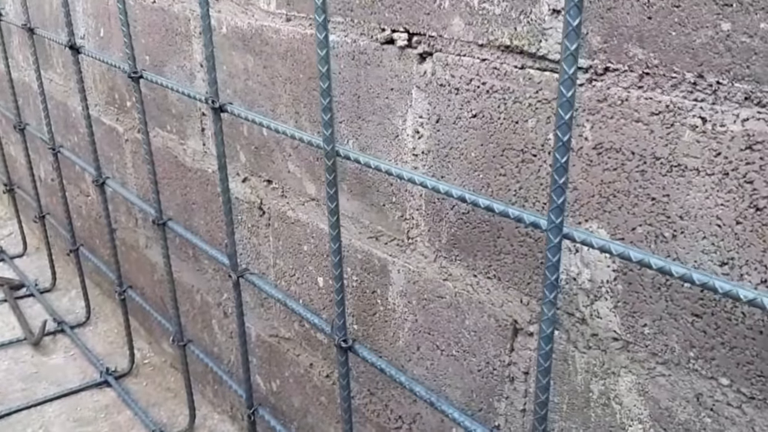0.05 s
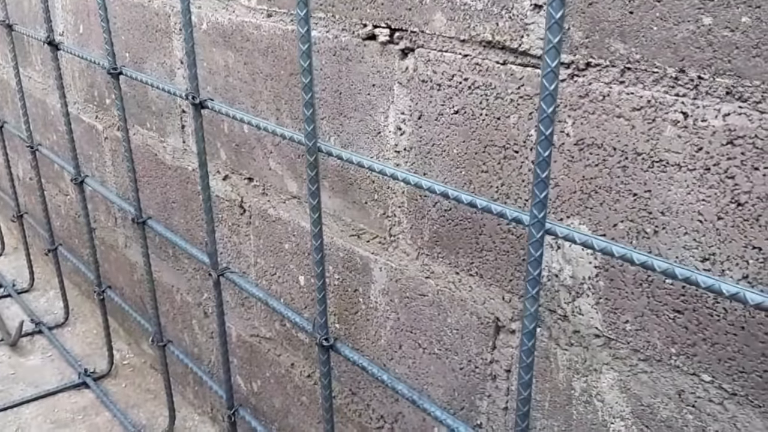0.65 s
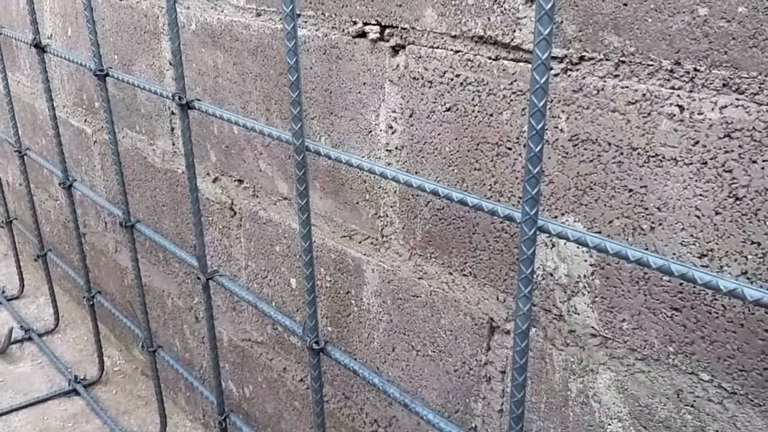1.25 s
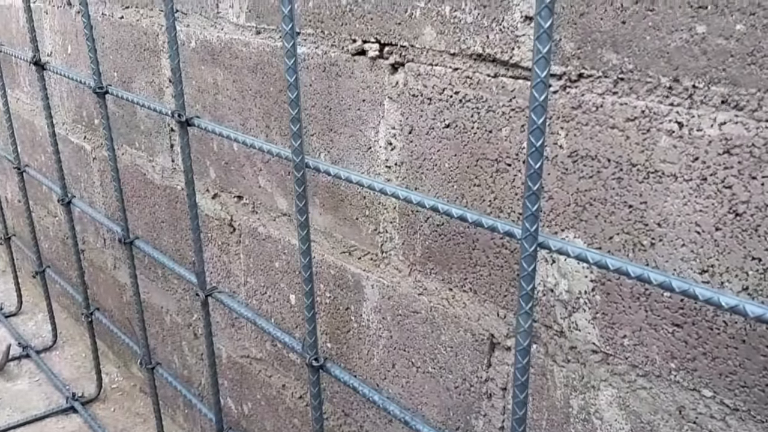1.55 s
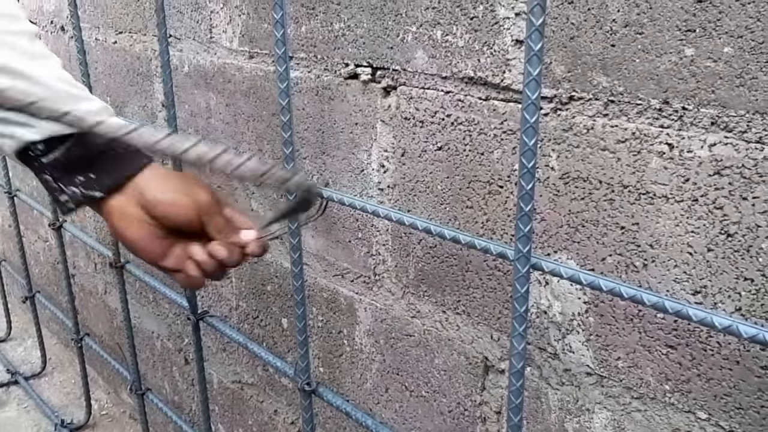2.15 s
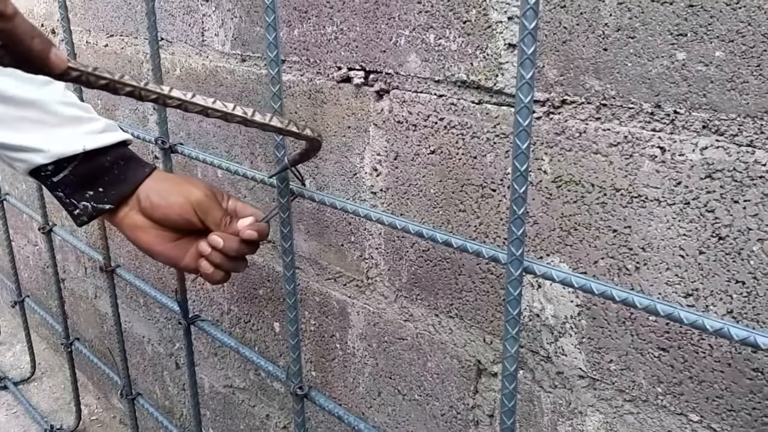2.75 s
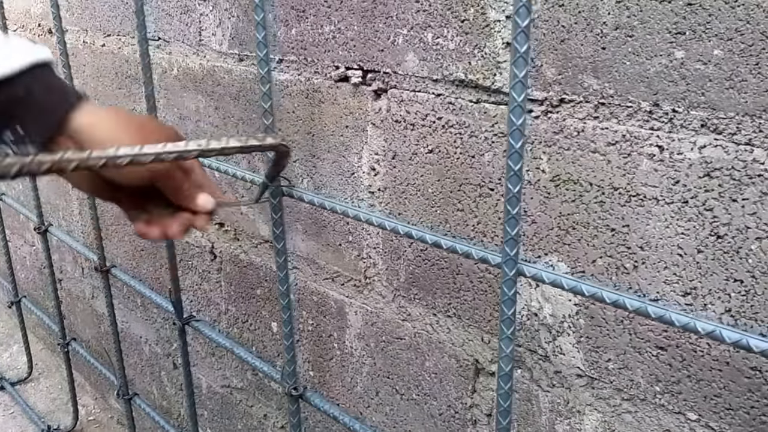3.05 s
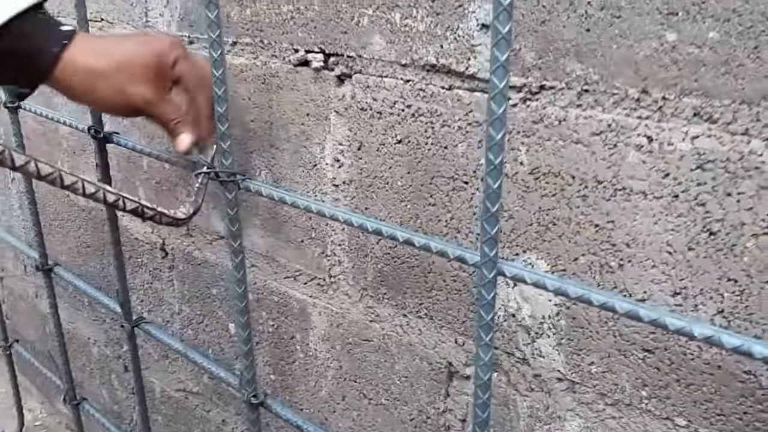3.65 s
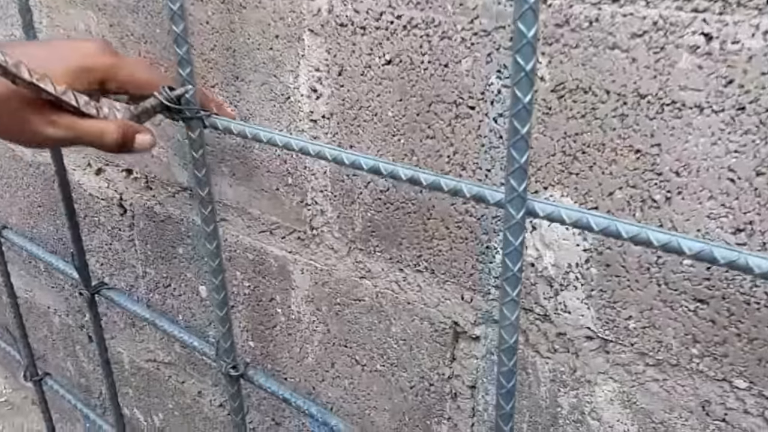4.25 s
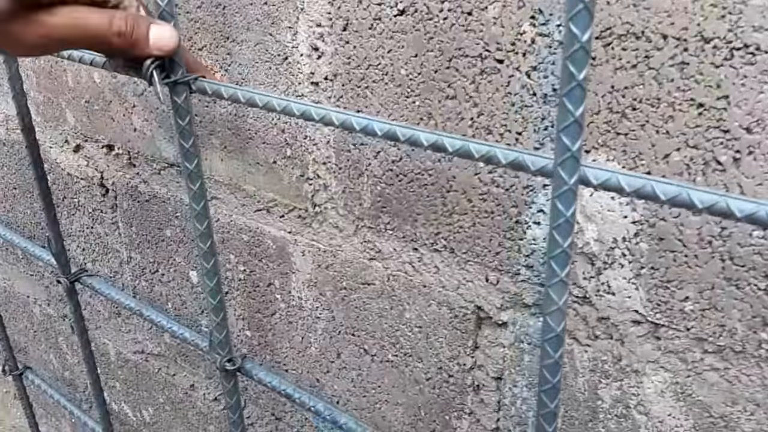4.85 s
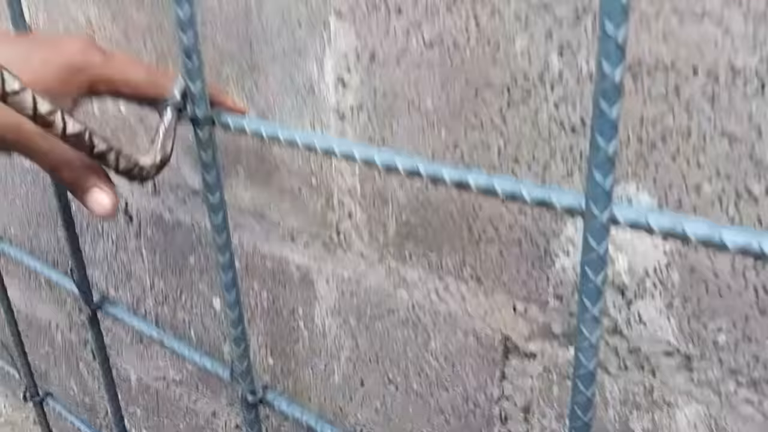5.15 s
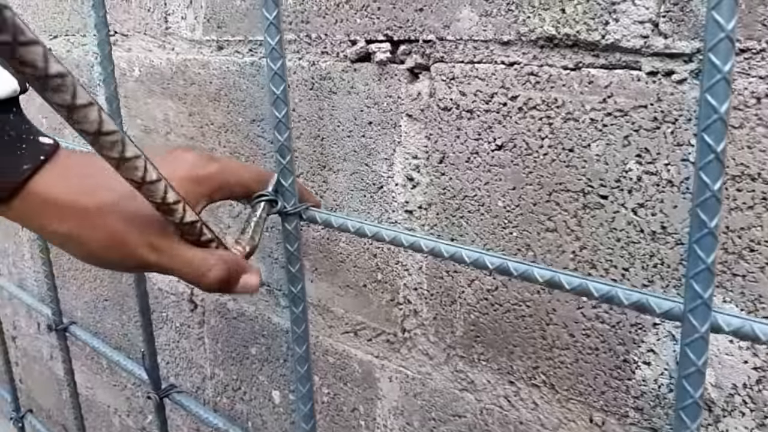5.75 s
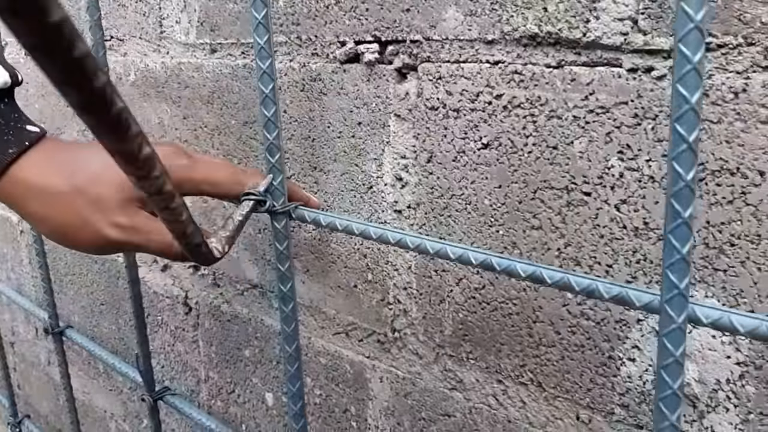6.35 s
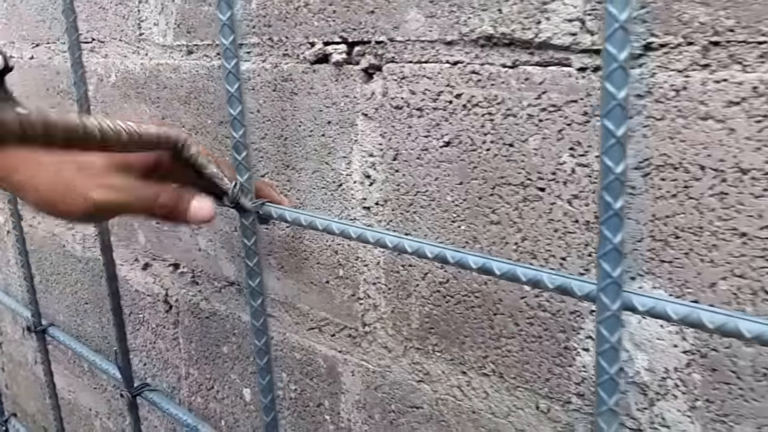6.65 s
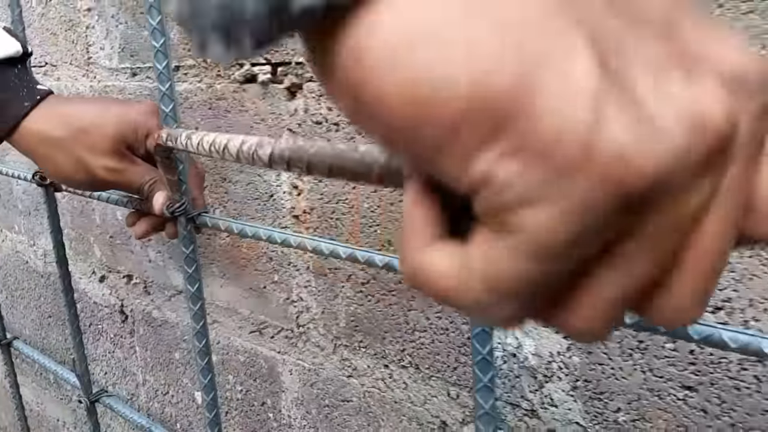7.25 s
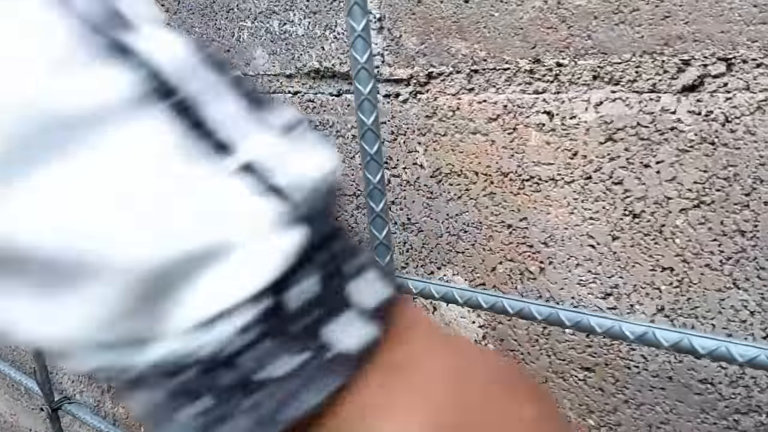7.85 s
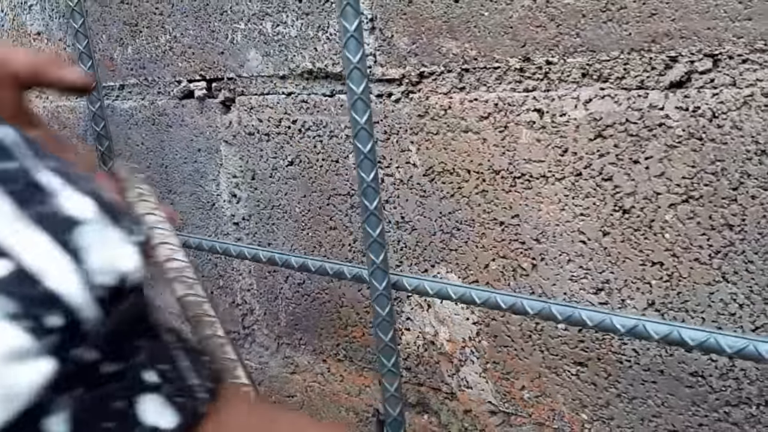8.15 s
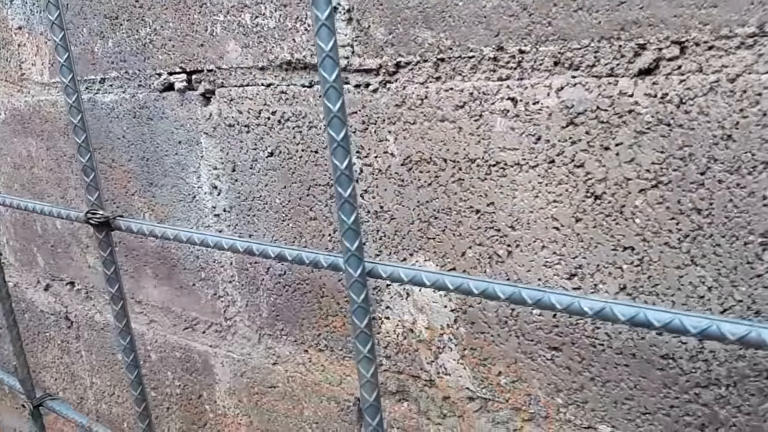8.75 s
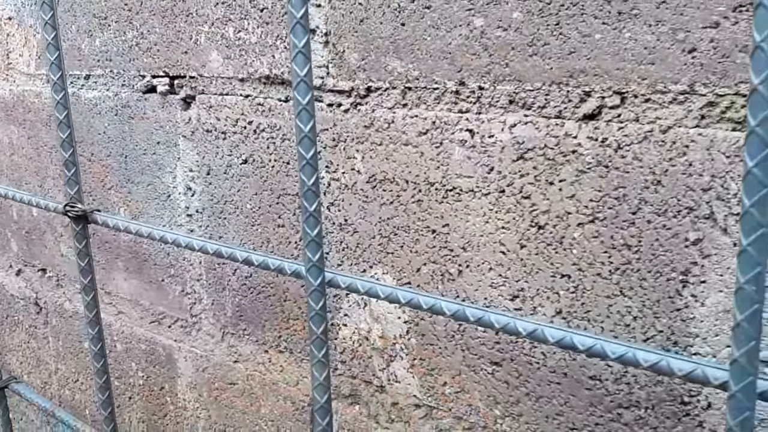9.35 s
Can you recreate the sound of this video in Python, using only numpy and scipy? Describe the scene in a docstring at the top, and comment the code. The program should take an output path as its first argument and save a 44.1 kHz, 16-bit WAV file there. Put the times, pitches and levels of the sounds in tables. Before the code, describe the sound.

Small wire clicks, gritty scrapes and light knocks surround a single loud clash of steel bars beside a block wall.

```python
"""Tying rebar in a bare room

Tie wire is twisted round a rebar mesh with a steel hook, close to a block wall in a ringing room.
The wire slips in small clicks, sleeve and grit scrape, masonry takes light knocks.
One loud blow sets the steel rattling and ducks the phone's gain. A low rumble hangs in the room."""
import sys
import numpy as np
from scipy import signal
from scipy.fft import rfft, irfft
from scipy.io import wavfile
from scipy.ndimage import uniform_filter1d, minimum_filter1d

SR = 44100
rng = np.random.default_rng(int(sys.argv[2]) if len(sys.argv) > 2 else 0)


def materialize(psi):
    """Save the field psi as 16-bit PCM at rate SR to the path in sys.argv[1].

    A 1-D psi becomes a single channel; in a 2-D psi each row is a channel.
    """
    bounded = np.clip(np.atleast_2d(psi).T, -1, 1)
    quanta = np.round(bounded * 32767).astype(np.int16)
    wavfile.write(sys.argv[1], SR, quanta)


N = 418068
T = np.arange(N) / SR

ROOM_DECAY = [(80, 1), (250, 0.71), (800, 0.44), (2000, 0.62), (5000, 0.48), (10000, 0.4), (16000, 0.23)]  # (frequency [Hz], t60 [s])
ROOM_MODES = [(91.1, 9.2, 5.5), (166.7, 3.9, -4), (181, 1.5, -22), (236.6, 15.7, -12)]  # (frequency [Hz], width [Hz], gain [dB])
BOOM_SWELLS = [(0.03, -45.5), (0.6, -50), (1.3, -66), (2.9, -57.5)]  # (time [s], level [dB])
WASH_SPECTRUM = [(20, -34), (45, -9.5), (70, -10), (110, -3), (135, -13.5), (165, -5), (240, -8.5),
                 (330, -15), (600, -19.5), (900, -20), (1400, -24), (2300, -20.5), (6000, -27.5),
                 (16000, -39)]  # (frequency [Hz], gain [dB])
ARM_MOVES = [(0, 0.033, -45), (.1, 0.576, -57.5), (1.015, 1.157, -52), (1.9, 2.2, -58.5),
             (2.692, 4.787, -57.5), (4.797, 6.616, -54), (6.62, 7.91, -58.5), (8.264, 8.607, -59),
             (8.878, 9.004, -48.5), (9.154, 9.48, -51.5)]  # (start [s], end [s], relative level [dB])
RUB_SPECTRUM = [(290, -31.5), (500, 0.5), (795, -6), (988, -10), (1060, -6), (1340, -27), (2160, 1.5),
                (2770, -5.5), (4940, 4), (8210, -3.5), (8960, -0.5), (16000, -10.5)]  # sleeve on wire: (frequency [Hz], gain [dB])
SQUEAK_MODES = [(1164, 270, 2), (2140, 540, 0.5), (4260, 780, -1)]  # (frequency [Hz], width [Hz], gain [dB])
GRIT_STROKES = [(0.122, -41.5, 0.04), (1.176, -39.5, 0.022), (1.361, -46, 0.04), (2.073, -40.5, 0.083),
                (2.192, -45, 0.031), (2.279, -45, 0.0095), (3.35, -23.5, 0.09), (3.455, -26, 0.019),
                (3.75, -39.5, .016), (3.892, -45, 0.026), (4.054, -48.5, 0.029), (5.86, -50.5, 0.028),
                (6.021, -46, 0.019), (7.15, -56.5, 0.076), (7.44, -48, 0.016), (8.762, -39.5, 0.04),
                (8.876, -32, 0.03), (8.969, -37, 0.05), (9.31, -39.5, 0.038), (9.443, -40, 0.042)]  # (peak time [s], relative level [dB], fall [s])
GRIT_SPECTRUM = [(300, -14.5), (480, -10), (900, -10.5), (1300, -16), (2150, -6), (3200, -9.5), (4400, 0.5),
                 (5300, -4.5), (6500, -6), (8500, -8), (12000, -10.5), (16000, -8.5)]  # (frequency [Hz], gain [dB])
MASONRY_KNOCKS = [(0.142, -38, 680, 0.01), (0.145, -45, 1820, 0.28), (1.022, -42, 260, 0.34),
                  (1.024, -43, 2590, 0.3), (1.349, -25.5, 558, 0.08), (5.56, -50.5, 165, 0.25),
                  (5.62, -49, 2860, 0.23), (6.471, -54.5, 307, 1), (7.128, -50, 860, 1),
                  (7.19, -53.5, 790, 0.9), (7.7189, -42.5, 2110, 0.08), (8.235, -51.5, 554, 0.36),
                  (8.519, -49.5, 2130, 0.23), (8.904, -41.5, 447, 0.46), (9.141, -47.5, 1520, 0.7),
                  (9.41, -45.5, 468, 0.9)]  # (time [s], level [dB], pitch [Hz], softness [0-1])
HOOK_MODES = [(862, 33, 14), (1800, 28, 12.5), (2380, 150, 12), (2900, 110, 14.5), (3500, 250, 5),
              (4140, 180, 12.5), (4570, 300, 9), (5200, 220, 10), (6340, 500, 6), (7800, 1200, 3),
              (13000, 3000, -17)]  # (frequency [Hz], width [Hz], gain [dB])
WIRE_SLIPS = [(0.584, -38.5), (0.889, -39), (1.084, -33), (1.110, -28), (1.142, -25.5), (1.172, -29),
              (2.412, -38.5), (2.449, -33.5), (2.632, -35.5), (4.320, -28.5), (4.406, -31.5), (4.427, -31),
              (4.912, -28.5), (4.969, -29), (5.118, -37), (5.249, -38.5), (5.496, -56), (5.940, -36),
              (6.118, -31), (6.172, -33), (6.375, -29), (6.401, -26), (7.432, -59), (8.098, -42),
              (8.734, -36), (8.860, -29.5), (9.247, -30), (9.272, -26.5)]  # (time [s], relative level [dB])
WIRE_SPECTRUM = [(240, -51.5), (400, -8), (1250, -11), (2220, -4), (3930, -2.5), (4380, 2.5), (6340, -4),
                 (10500, -4.5), (12300, -11.5), (14400, -4), (16000, -2.5)]  # (frequency [Hz], gain [dB])
TICK_SPECTRUM = [(1500, -13), (6000, -4), (14000, 0.5)]  # wire snap: (frequency [Hz], gain [dB])
STEEL_BLOWS = [(2.988, -5, -21), (2.994, 3.5, -6.5), (3.005, -12, 6), (3.023, -9.5, -19.5),
               (3.042, -7.5, -10.5), (3.065, -10.5, 0), (3.124, -8.5, -26)]  # clash and rebounds: (time [s], relative force [dB], relative thump [dB])
STEEL_MODES = [(163, -6, .8), (187, -6, .6), (215, -1, .6), (233, 2, .75), (257, -2, .6), (305, -2, .6),
               (336, -4, .6), (381, -3, .6), (405, -5, .6), (589, -3, .55), (813, -8, .7), (1066, -9, .4),
               (1346, -5, .45), (2272, -14, .5), (3242, -6, .8), (3914, -11, .35), (4290, -10, .4),
               (5602, -3, .45), (6002, -0.5, .68), (8113, -15, .4), (8608, -15, .5), (13780, -9, .52)]  # (frequency [Hz], relative level [dB], t60 [s])
CLASH_SPECTRUM = [(70, -34.5), (130, -21), (230, -17), (450, -13), (780, -14), (1050, -17), (1500, -25),
                  (2300, -16), (3100, -20.5), (4300, -14.5), (5900, -16.5), (8000, -22), (11800, -28),
                  (16000, -22.5)]  # (frequency [Hz], gain [dB])
PORT_CORRELATION = [(100, 0.98), (250, 0.78), (600, 0.69), (1200, 0), (16000, 0.04)]  # two microphone ports: (frequency [Hz], correlation [0-1])
PORT_BALANCE = [(100, -0.5), (300, -2.5), (700, -4), (1800, 0.5), (4500, 0.5), (6500, -5.5), (8500, -13),
                (11000, -5.5), (14000, -5)]  # (frequency [Hz], left minus right [dB])


def undb(db):
    """Decibels to gain."""
    return 10 ** (np.asarray(db) / 20)


def unit(x):
    """Scale to rms 1."""
    return x / np.sqrt(np.mean(x ** 2))


def peak(x, db, window=220):
    """Set the highest short-time rms of the mid signal."""
    return x * undb(db) / np.sqrt(uniform_filter1d(x.mean(0) ** 2, window).max())


def add(out, at_s, x):
    """Mix x in at a time."""
    i = max(int(at_s * SR), 0)
    out[:, i:i + x.shape[-1]] += x[:, :max(N - i, 0)]


def bell(at_s, half_s):
    """Gaussian swell of height 1."""
    return np.exp(-((T - at_s) / half_s) ** 2)


def walk(rate_hz):
    """Smooth random drift, rms 1."""
    step = int(SR / rate_hz)
    stairs = np.repeat(rng.standard_normal(N // step + 1), step)
    return unit(uniform_filter1d(stairs, step)[:N])


def along(table, hz):
    """Interpolate a table over log frequency."""
    f, value = np.transpose(table)
    return np.interp(np.log(hz + 1), np.log(f), value)


def shape(x, gain, size=16384):
    """Minimum-phase filter of magnitude gain(Hz)."""
    cepstrum = irfft(np.log(gain(np.arange(size // 2 + 1) * SR / size) + 1e-6))
    cepstrum[1:size // 2] *= 2
    cepstrum[size // 2 + 1:] = 0
    response = irfft(np.exp(rfft(cepstrum)))
    filtered = signal.fftconvolve(np.atleast_2d(x), response[None], axes=1)
    return filtered[:, :x.shape[-1]].reshape(x.shape)


def colour(x, spectrum):
    """Filter by (frequency [Hz], gain [dB]) points."""
    return shape(x, lambda f: undb(along(spectrum, f)))


def resonance(f, hz, width_hz):
    """Band-pass gain, 1 at the centre."""
    return f * width_hz / np.hypot(f * f - hz * hz, f * width_hz)


def grains(length, spread_db, grain_samples=24):
    """Dense micro-impacts of uneven size, two channels."""
    sizes = undb(spread_db * np.minimum(rng.exponential(size=length // grain_samples + 1), 5))
    return unit(rng.standard_normal((2, length)) * np.repeat(sizes, grain_samples)[:length])


def two_ports(x):
    """Correlate two independent signals in the bass."""
    a, b = rfft(x)
    correlation = np.clip(along(PORT_CORRELATION, np.linspace(0, SR / 2, len(a))), -.99, .99)
    mid, side = a * np.sqrt(1 + correlation), b * np.sqrt(1 - correlation)
    return irfft(np.array([mid + side, mid - side]), x.shape[-1])


def echoes(force, late_db=-25, late_t60_s=2.98):
    """Diffuse field between bare walls: treble dies first, a dull echo stays late."""
    noise = rfft(rng.standard_normal((2, len(force))))
    f = np.linspace(0, SR / 2, len(force) // 2 + 1)
    centres_hz, t60s = np.transpose(ROOM_DECAY)
    bands = [np.interp(np.log(f + 1), np.log(centres_hz), row) for row in np.eye(len(ROOM_DECAY))]
    bands.append(undb(late_db) / (1 + (f / 1000) ** 2))
    field = 0
    for band, t60_s in zip(bands, [*t60s, late_t60_s]):
        energy = signal.lfilter([1], [1, -np.exp(-2 * np.log(1000) / (t60_s * SR))], force ** 2)
        field = field + irfft(noise * band, len(force)) * np.sqrt(energy)
    return unit(two_ports(field))


def room_tail():
    """Room impulse response; the near wall lifts the first echoes."""
    t = T[:SR * 3 // 2]
    wall_lift = 1 + 8.5 * np.exp(-t / 0.27)
    tail = echoes(signal.unit_impulse(len(t))) * wall_lift * (t > .002)
    return unit(tail) / np.sqrt(len(t))


def in_room(x, tail, room_db):
    """Direct sound plus echoes."""
    length = x.shape[-1]
    wet = signal.fftconvolve(x.mean(0, keepdims=True), tail[:, :length], axes=1)
    return x + undb(room_db) * wet[:, :length]


def arm_effort(attack_s=0.043, release_s=0.062, rest_db=-68):
    """Envelope of the arm's movements; it never quite rests."""
    effort = undb(rest_db)
    for start_s, end_s, db in ARM_MOVES:
        attack = np.clip((T - start_s) / attack_s + 1, 0, 1)
        release = np.exp(-np.maximum(T - end_s, 0) / release_s)
        effort = np.maximum(effort, undb(db) * attack * release)
    return effort


def rumble(boom_db=-55.5, dip_db=-19.5, wash_db=-63, linger_t60_s=2.32):
    """Distant noise booms in low room modes; a dull wash follows the arm and lingers after the blow."""
    def modes(f):
        return sum(undb(db) * resonance(f, hz, width_hz) * resonance(f, hz, 6 * width_hz)
                   for hz, width_hz, db in ROOM_MODES)

    boom = shape(two_ports(rng.standard_normal((2, N))), modes)
    wash = colour(two_ports(rng.standard_normal((2, N))), WASH_SPECTRUM)
    boom_gain = undb(boom_db) + sum(undb(db) * bell(at_s, half_s=0.22) for at_s, db in BOOM_SWELLS)
    boom_gain *= undb(dip_db * bell(at_s=4.43, half_s=0.39))
    age_s = T - STEEL_BLOWS[0][0]
    linger = undb(-21.5) * np.exp(-np.log(1000) * np.abs(age_s) / linger_t60_s) * (age_s > 0)
    handling = undb(-3.5) * arm_effort()
    wash_gain = np.sqrt(undb(wash_db) ** 2 + handling ** 2 + linger ** 2)
    return unit(boom) * boom_gain + unit(wash) * wash_gain


def squeak(tail, level_db=-57.5):
    """A faint rasp swells and sings in three resonances."""
    def modes(f):
        return sum(undb(db) * resonance(f, hz, width_hz) ** 2 for hz, width_hz, db in SQUEAK_MODES)

    rasp = shape(grains(N, 1), modes) * bell(at_s=1.637, half_s=0.18)
    return peak(in_room(rasp, tail, room_db=-6.5), level_db)


def chirps(tail, count=45, centre_hz=5600, spread_oct=0.88, half_s=0.01):
    """The rubbing catches at random and squeaks on a narrow, high resonance."""
    out, t = np.zeros((2, N)), T[:SR // 4]
    envelope = np.exp(-((t - t.mean()) / half_s) ** 2)
    for when, pitch in rng.random((count, 2)):
        hz = centre_hz * 2 ** (spread_oct * (2 * pitch - 1))
        ring = unit(shape(grains(len(t), 1), lambda f: resonance(f, hz, width_hz=130) ** 2))
        add(out, when * T[-1], ring * envelope)
    return in_room(out * arm_effort() * undb(-10.5), tail, room_db=-9.5)


def scrapes(tail, rise_ratio=0.58):
    """Grit drags in juddering strokes; sleeve and wire rub, catching and letting go."""
    force = 0
    for at_s, db, fall_s in GRIT_STROKES:
        rise = np.exp(-np.maximum((at_s - T) / (rise_ratio * fall_s), 0) ** 2)
        fall = np.exp(-np.maximum((T - at_s) / fall_s, 0))
        force = force + undb(db) * rise * fall
    judder = undb(3.2 * walk(rate_hz=130))
    grit = unit(colour(grains(N, 1.3), GRIT_SPECTRUM) * judder) * force
    catch = undb(2.8 * walk(rate_hz=32))
    rub = unit(colour(grains(N, 2.4, grain_samples=40), RUB_SPECTRUM)) * arm_effort() * catch
    return in_room(undb(2.5) * grit + undb(-1) * rub, tail, room_db=-1.8)


def knocks(tail, thud_db=-11):
    """Crunching pushes excite a damped masonry mode and a sub-octave thud; soft ones are diffuse."""
    out, t = np.zeros((2, N)), T[:SR * 3 // 4]
    for at_s, db, hz, softness in MASONRY_KNOCKS:
        def masonry(f):
            mode = resonance(f, hz, width_hz=hz * (0.14 + 3.1 * softness))
            thud = undb(thud_db) * resonance(f, hz / 2, hz / 2) ** 2
            return mode * (mode + 0.15) + thud

        push = 0.1 * grains(len(t), 1) * np.exp(-t * hz / 8)  # heavier things stay in contact longer
        push[:, 0] += 1
        knock = in_room(shape(push, masonry), tail, room_db=-4 + 22 * softness)
        add(out, at_s, peak(knock, db, window=440))
    return out


def hook_skid(tail, at_s=8.149, rise_s=0.021, fall_s=0.026, level_db=-31):
    """The hook skids off a ribbed bar; the rasp excites the tool's modes."""
    def modes(f):
        return np.sqrt(sum((undb(db) * resonance(f, hz, width_hz)) ** 2
                           for hz, width_hz, db in HOOK_MODES))

    out, t = np.zeros((2, N)), T[:SR // 2]
    envelope = np.minimum(t / rise_s, 1) ** 2 * np.exp(-np.maximum(t - rise_s, 0) / fall_s)
    rasp = shape(grains(len(t), 1) * envelope, modes)
    add(out, at_s, peak(in_room(rasp, tail, room_db=-10.5), level_db))
    return out


def wire_slips(tail, fall_s=0.025, release_s=0.012, treble_db=3, snap_at_s=6.678):
    """The wire lets go under the hook in bursts of tiny slips; once it snaps with a dry tick."""
    def wire(f):
        return undb(along(WIRE_SPECTRUM, f) + treble_db * np.clip((f - 4000) / 8000, 0, 1))

    out, t = np.zeros((2, N)), T[:SR // 2]
    envelope = np.exp(-t / fall_s) + 0.66 * np.exp(-t / release_s)
    for at_s, db in WIRE_SLIPS:
        burst = shape(grains(len(t), 0.47) * envelope, wire)
        add(out, at_s, peak(in_room(burst, tail, room_db=-1.5), db - 8))
    tick = colour(grains(len(t), 1) * np.exp(-t / 0.00018), TICK_SPECTRUM)
    add(out, snap_at_s, peak(tick, db=-37))
    return out


def steel_crash(contact_s=0.027, thump_rise_s=0.005, thump_fall_s=0.05):
    """Steel clashes and rebounds; the bars ring on and the blows boom in the room's lowest resonance."""
    t, force, boom = T[:2 * SR], np.zeros(2 * SR), np.zeros(2 * SR)
    start_s = STEEL_BLOWS[0][0]
    for at_s, force_db, thump_db in STEEL_BLOWS:
        age_s = np.maximum(t - (at_s - start_s), 0)
        force += undb(force_db) * np.exp(-age_s / contact_s) * (age_s > 0)
        boom += undb(thump_db) * (1 - np.exp(-age_s / thump_rise_s)) * np.exp(-age_s / thump_fall_s)
    contacts = two_ports(unit(grains(len(t), 1.7) * force))  # the steel touches at many spots
    rattle = colour(contacts + undb(5) * echoes(force), CLASH_SPECTRUM)
    bass = signal.sosfiltfilt(signal.butter(2, 420, fs=SR, output="sos"), rattle)
    rattle -= bass * np.exp(-(t / 0.025) ** 2)  # heavy bars are slow to move
    ring = 0
    for hz, db, t60_s in STEEL_MODES:
        port_phase = np.array([[0], [min(hz / 4000, .2)]])  # high modes arrive out of step
        tone = np.sin(2 * np.pi * (hz * t + rng.random() + port_phase))
        ring = ring + undb(db) * np.exp(-np.log(1000) * t / t60_s) * tone
    ring *= 1 - np.exp(-t / .03)  # builds over the rebounds
    steel = peak(rattle, db=0, window=3000) + peak(ring, db=-3.5, window=3000)
    thump = boom * (np.sin(2 * np.pi * 91.5 * t) + 0.81 * np.sin(2 * np.pi * 106 * t))
    out = np.zeros((2, N))
    add(out, start_s, undb(-2.5) * steel + peak(np.array([thump, thump]), db=-2.5, window=1500))
    return out


def scene():
    """Crash, small sources and rumble; each small source has its own tail of the same room."""
    sources = (wire_slips, scrapes, chirps, knocks, hook_skid, squeak)
    return steel_crash() + sum(source(room_tail()) for source in sources) + rumble()


def gain_control(x, threshold_db=-10.5, hold_s=1.047, release_s=0.3):
    """A loud sound cuts the gain at once; it holds, then recovers."""
    level_db = 10 * np.log10(uniform_filter1d(np.mean(x ** 2, 0), 1024) + 1e-12)
    cut_db = np.minimum(threshold_db - level_db, 0)
    hold, release = int(hold_s * SR), int(release_s * SR)
    held_db = minimum_filter1d(cut_db, hold, origin=(hold - 1) // 2)
    released_db = uniform_filter1d(held_db, release, origin=(release - 1) // 2)
    return x * undb(np.minimum(held_db, released_db))


def record(dry, ceiling=0.86, cutoff_hz=15800):
    """Phone: two unequal ports, gain control, soft clip, steep low-pass."""
    left = shape(dry[0], lambda f: np.sqrt(2 / (1 + undb(-2 * along(PORT_BALANCE, f)))))
    right = shape(dry[1], lambda f: np.sqrt(2 / (1 + undb(2 * along(PORT_BALANCE, f)))))
    clipped = ceiling * np.tanh(gain_control(np.array([left, right])) / ceiling)
    return signal.sosfilt(signal.ellip(10, .2, 70, cutoff_hz, fs=SR, output="sos"), clipped)


dry = scene()
out = record(dry)
materialize(out)
```